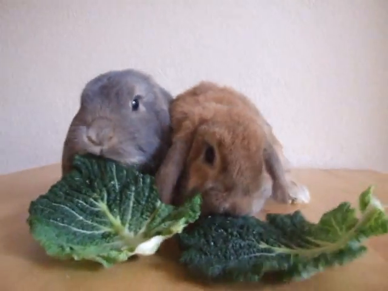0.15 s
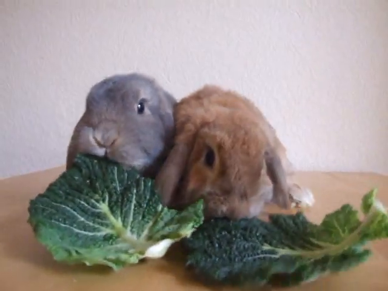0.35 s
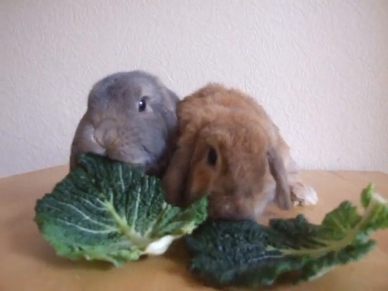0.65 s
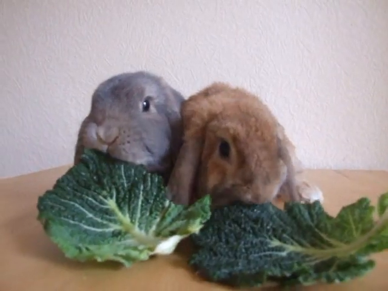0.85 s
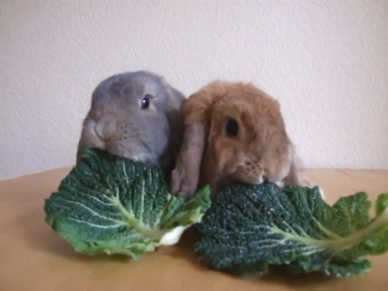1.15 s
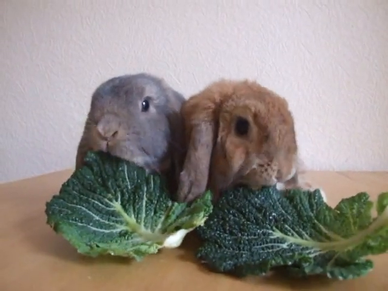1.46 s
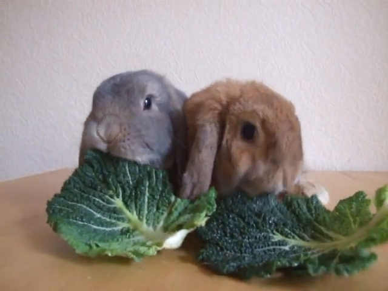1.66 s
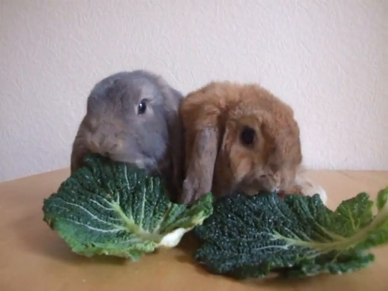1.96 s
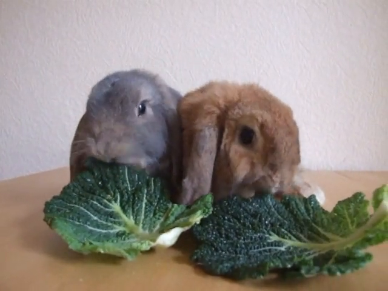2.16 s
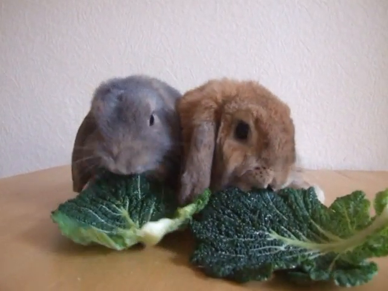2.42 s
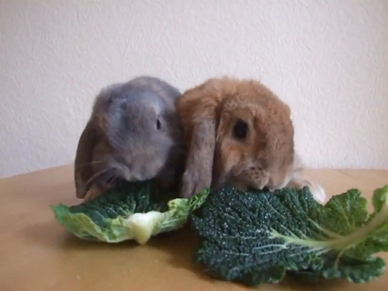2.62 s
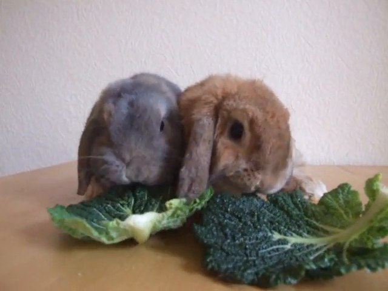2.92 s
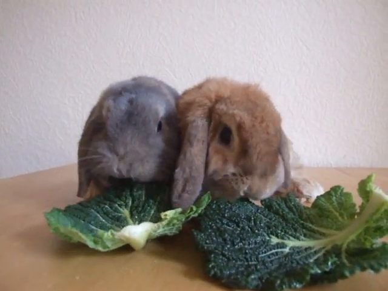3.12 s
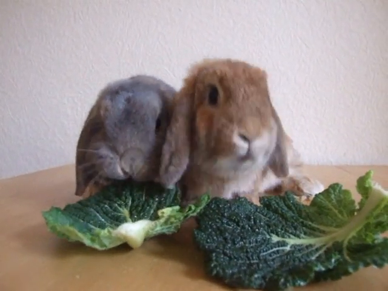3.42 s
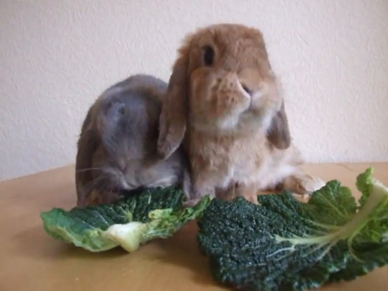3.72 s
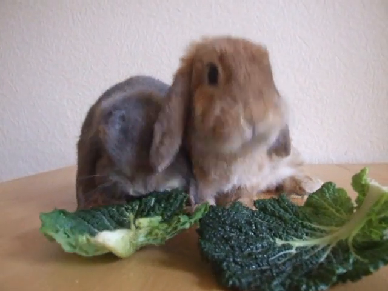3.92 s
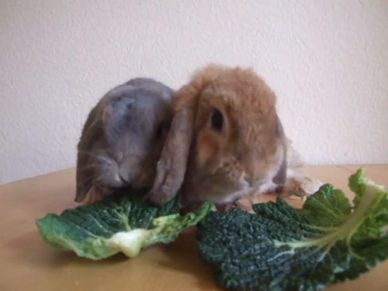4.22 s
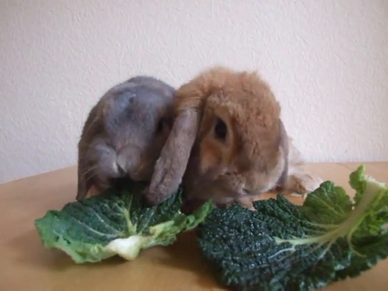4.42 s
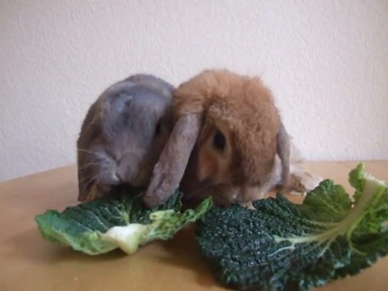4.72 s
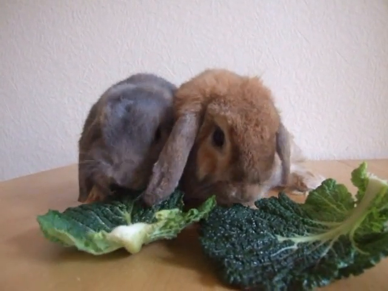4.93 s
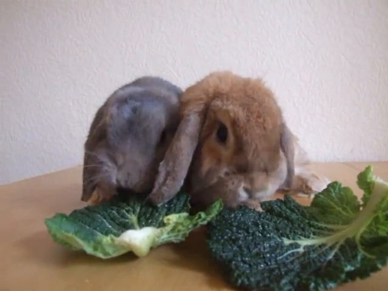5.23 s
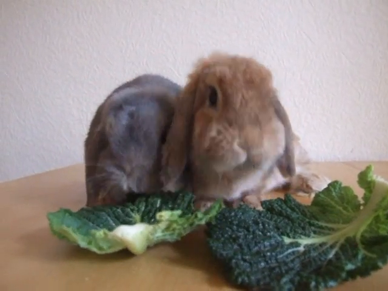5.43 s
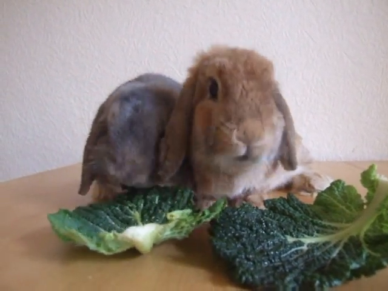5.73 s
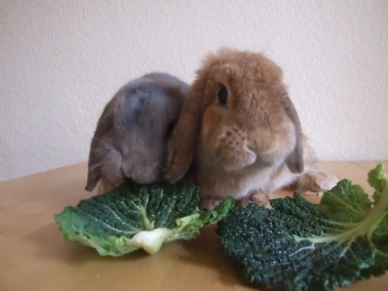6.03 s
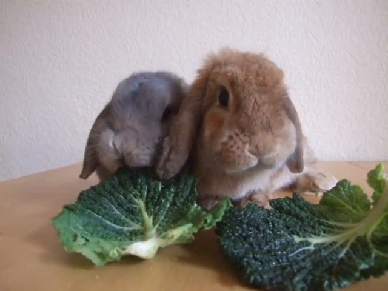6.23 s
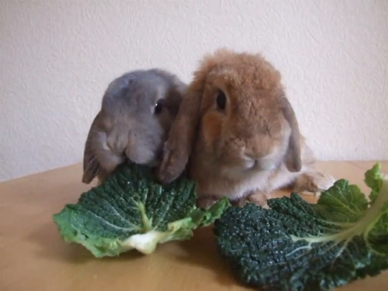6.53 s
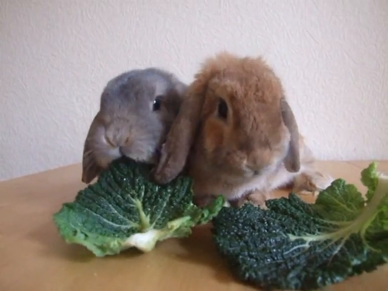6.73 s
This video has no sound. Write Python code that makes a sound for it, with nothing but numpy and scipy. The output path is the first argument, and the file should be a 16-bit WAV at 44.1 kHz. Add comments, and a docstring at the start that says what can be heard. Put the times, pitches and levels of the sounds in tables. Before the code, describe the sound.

Quick crunchy bites of leafy greens, tiny splintering cracks and soft chewing, with faint focus-motor ticking, low hum and a distant engine.

```python
"""Crisp snaps and soft crackle: two rabbits nibble savoy cabbage leaves on a table in a small quiet room.
Each bite cracks the skin, breaks the blade and splinters: noise bursts ringing through resonances.
Dense tiny cracks make the tearing, rustling and chewing; short rubs make the squeaks and bumps.
A camera's focus motor pips in runs of steps; filtered noise and sines make hiss, hum, whirr and engine drone."""
import sys
import numpy as np
from scipy import signal
from scipy.fft import rfft, irfft, next_fast_len
from scipy.io import wavfile

SR = 44100
rng = np.random.default_rng(int(sys.argv[2]) if len(sys.argv) > 2 else 0)


def to_wav(s):
    """Save 16-bit WAV."""
    ch = np.atleast_2d(s).T  # columns
    pcm = np.round(np.clip(ch, -1, 1) * 32767)  # PCM
    wavfile.write(sys.argv[1], SR, pcm.astype(np.int16))


N = 302967
TIME = np.arange(N) / SR
CUTOFF_HZ = 8100


def from_db(db):
    """Decibels to amplitude gain."""
    return 10 ** (np.asarray(db) / 20)


def rms_one(x):
    """Scale to rms 1."""
    return x / np.sqrt(np.mean(x ** 2) + 1e-20)


def in_time(rows):
    """Each column of a breakpoint curve, interpolated at every sample."""
    s, *columns = np.transpose(rows)
    return [np.interp(TIME, s, c) for c in columns]


def add(track, s, sound):
    """Mix a short sound into the track at time s."""
    start = int(np.clip(s * SR, 0, N - 1))
    track[start:start + len(sound)] += sound[:N - start]


def coloured(x, points):
    """Shape a signal by a spectrum of f/Hz, level/dB points, joined on a log frequency axis."""
    hz, db = np.transpose(points)
    size = next_fast_len(len(x))
    bins = np.maximum(np.fft.rfftfreq(size, 1 / SR), 1)
    gain = from_db(np.interp(np.log(bins), np.log(hz), db))
    return irfft(rfft(x, size) * gain, size)[:len(x)]


def resonance(x, hz, width_hz):
    """Two-pole resonance with gain about 1 on top."""
    r = np.exp(-np.pi * width_hz / SR)
    zeros = np.array([1, 0, -1]) * (1 - r * r) / 2
    poles = [1, -2 * r * np.cos(2 * np.pi * hz / SR), r * r]
    return signal.lfilter(zeros, poles, x + 1e-18)


def drift(rate):
    """Random wander of spread 1, in straight lines between knots at `rate` per second."""
    knots = rng.standard_normal(4096)
    return rms_one(np.interp(TIME * rate, np.arange(len(knots)), knots))


def top_cut(x):
    """Steep low-pass at the cut-off, without delay."""
    return signal.fftconvolve(x, signal.firwin(141, CUTOFF_HZ, window=("kaiser", 6), fs=SR), "same")


# Bites: skin cracks, blade breaks, then it splinters. Knock levels here and below are before KNOCK_TRIM_DB
# [break t/s, level/dB, ring f/Hz, knock level/dB, skin crack's lead t/s, skin level/dB, splinter level/dB]
BITE_TABLE = [(0.0233, -23.5, 3940, -54, .0098, -38.5, -53), (.184, -25, 4400, -50, 0.01, -33, -52),
              (0.3754, -35, 6300, -60, .02, -58, -48), (0.6787, -32, 5700, -43, .006, -56, -46),
              (1.0144, -33, 5920, -38, 0.0065, -54, -58), (1.2183, -40, 7260, -61, 0.0044, -47, -42),
              (1.2474, -35, 7000, -39, .009, -36, -45), (1.4684, -29.5, 5170, -39, 0.016, -31.5, -52),
              (1.4826, -31, 6900, -35, 0.0043, -46, -45), (1.9232, -31, 6470, -57, 0.017, -44.5, -40),
              (2.1639, -27.5, 5870, -34, 0.0078, -33, -34.5), (2.213, -38, 6950, -62, .01, -49, -49),
              (2.35, -32, 7050, -38, .02, -52, -38), (2.3664, -33.5, 5000, -32, 0.009, -40, -33.5),
              (2.4108, -40, 6360, -54, .025, -40, -55), (2.5975, -29, 7350, -41, .0221, -34, -51),
              (2.7907, -35, 5200, -37.5, 0.0067, -34.5, -48),
              (3.0212, -32.5, 4820, -36.5, 0.0067, -57, -47), (3.244, -35, 6460, -42, .014, -46, -41),
              (3.4668, -37.5, 4560, -39.5, .006, -51, -52), (3.4893, -35.5, 7050, -47, 0.0045, -54, -46),
              (3.7175, -32.5, 6000, -48, 0.0032, -35, -46), (3.9106, -33.5, 7000, -46, .006, -57, -36),
              (4.4653, -34.5, 7060, -47, 0.0045, -48, -52), (4.5098, -33, 6900, -49, 0.0047, -57, -30),
              (4.524, -25, 5200, -28.5, 0.012, -36, -41), (4.7957, -40.5, 5570, -45, 0.024, -55, -54),
              (5.2854, -22, 6310, -46.5, 0.0019, -31, -42), (5.3045, -18.5, 6330, -36.5, .0092, -32, -49),
              (5.9132, -27, 6470, -65, 0.0046, -32.5, -35), (6.1001, -36.5, 7100, -47, .008, -45, -40.5),
              (6.2978, -39.5, 4830, -37.5, 0.015, -46, -49), (6.5645, -39.5, 5900, -60, 0.015, -38.5, -38),
              (6.7641, -28, 5000, -29, 0.022, -42.5, -40), (6.784, -35, 5000, -38.5, .003, -44, -39)]
SKIN_HZ, SKIN_KNOCK_DB = 6390, -19   # knock relative to the skin crack
SPLINTER_GAP_S, SPLINTER_LOSS_DB = .0055, 5.5   # mean spacing; mean loss from one to the next
SPLINTER_HZ, SPLINTER_KNOCK_DB = 6300, -14   # mean ring; knock relative to the splinter


def bite_cracks():
    """A bite cracks the stiff skin, breaks the blade, then sheds four weakening splinters."""
    rows = []
    chances = rng.uniform(-1, 1, (len(BITE_TABLE), 4, 3))
    for (s, db, hz, knock_db, lead_s, skin_db, splinter_db), chance in zip(BITE_TABLE, chances):
        rows.append((s - lead_s, skin_db, SKIN_HZ, skin_db + SKIN_KNOCK_DB))
        rows.append((s, db, hz, knock_db))
        for k, (gap, size, pitch) in enumerate(chance):
            s = s + SPLINTER_GAP_S * (1 + .5 * gap)
            level_db = splinter_db - SPLINTER_LOSS_DB * k + 2 * size
            splinter_hz = SPLINTER_HZ * (1 + .15 * pitch)
            rows.append((s, level_db, splinter_hz, level_db + SPLINTER_KNOCK_DB))
    return rows


# Teeth meeting with a dull click [t/s, knock level/dB]
TOOTH_CLICK_TABLE = [(1.0889, -40.5), (1.339, -43), (1.5697, -42.5), (1.5965, -40), (1.9362, -36.5),
                     (2.0473, -36), (2.6064, -42), (2.6738, -39.5), (5.0423, -41), (6.0087, -44.5),
                     (6.3135, -38.5), (6.3792, -45), (6.745, -36.5)]
TOOTH_HZ, TOOTH_RING_DB = 2180, -8.5   # ring relative to the click


def tooth_clicks():
    """Meeting teeth give mostly knock and a weaker, lower ring."""
    return [(s, db + TOOTH_RING_DB, TOOTH_HZ, db) for s, db in TOOTH_CLICK_TABLE]


TICKS_PER_S, TICK_DB, TICK_SPREAD_DB = 14, -48, 1   # TICK_DB is the quietest level
TICK_LOW_HZ, TICK_HIGH_HZ, TICK_KNOCK_DB = 3600, 7760, -8   # knock relative to the tick


def stray_ticks():
    """Handled leaves tick at random times and pitches."""
    rows = []
    for when, size, pitch in rng.random((int(TICKS_PER_S * N / SR), 3)):
        level_db = TICK_DB - TICK_SPREAD_DB * np.log(max(size, .1))
        hz = TICK_LOW_HZ + pitch * (TICK_HIGH_HZ - TICK_LOW_HZ)
        rows.append((when * (N - 1) / SR, level_db, hz, level_db + TICK_KNOCK_DB))
    return rows


# Width of a snap's ring by its pitch, tough ribs to thin blade [f/Hz, width/Hz]
RING_WIDTH_CURVE = [(2000, 540), (4400, 3460), (5600, 3300), (6900, 860)]
SNAP_S = .0022   # length over which a snap's rms level is reckoned
KNOCK_TRIM_DB = -0.5


def snaps(rows, split_s=0.00054, split_size=0.25, broad_share=0.049, broad_hz=3000,
          knock_hz=1150, knock_width_hz=1900):
    """A cell wall bursts and its neighbours split in about a millisecond; leaf and jaw knock dully."""
    out, t = np.zeros(N), np.arange(512) / SR
    burst = np.arange(len(t)) == 0
    span = np.sqrt(SNAP_S * SR / len(t))
    lead = 32   # samples of room for the low-pass to ring before the onset
    for s, level_db, hz, dull_db in rows:
        force = burst + split_size * rng.standard_normal(len(t)) * np.exp(-t / split_s)
        half = min(np.interp(hz, *np.transpose(RING_WIDTH_CURVE)) / 2, .8 * hz)
        ring = signal.lfilter(*signal.butter(2, [hz - half, hz + half], "band", fs=SR), force)
        broad = resonance(resonance(force, broad_hz, broad_hz), hz, 2 * hz)
        crisp = top_cut(np.pad(ring + broad_share * broad, (lead, 0))[:len(t)])
        knock = resonance(resonance(force, knock_hz, knock_width_hz), knock_hz, knock_width_hz)
        add(out, s - lead / SR, span * from_db(level_db) * rms_one(crisp))
        add(out, s, span * from_db(dull_db + KNOCK_TRIM_DB) * rms_one(knock))
    return out


def crackle(colour, per_s=1500, spread_db=4.0, clump_db=5.0):
    """Countless tiny leaf cracks in quick clumps; rms 1."""
    born = rng.random(N) < per_s / SR
    sizes = from_db(spread_db * np.minimum(rng.exponential(1, N), 3)) * rng.choice([-1, 1], N)
    clumps = from_db(clump_db * drift(rate=98))
    return rms_one(top_cut(coloured(born * sizes * clumps, colour)))


# Colour of the leaf crackle, also heard in the drags below [f/Hz, relative level/dB]
LEAF_COLOUR = [(500, -15.5), (1200, -13.5), (2200, -8.5), (3300, -11), (5000, -5), (7000, 0.5), (8500, -13)]


def tearing(rows, reach_s=0.015, level_db=-34.5, growth=0.6):
    """Fibres give way just before and after each snap, more so around the big ones."""
    power = np.zeros(N)
    for s, snap_db, _, _ in rows:
        power[int(s * SR)] += from_db(growth * snap_db + level_db) ** 2
    strain = np.exp(-np.abs(np.arange(-4096, 4097)) / (reach_s * SR))
    swell = np.sqrt(np.maximum(signal.fftconvolve(power, strain, "same"), 0))
    return swell * crackle(LEAF_COLOUR)


def rubs(rows, rise_s, width_hz):
    """Brief friction that swells and dies in one resonance."""
    out, t = np.zeros(N), np.arange(4096) / SR
    swell = t / rise_s * np.exp(1 - t / rise_s)
    for s, db, hz in rows:
        force = swell * rng.standard_normal(len(t))
        sound = resonance(resonance(force, hz, width_hz), hz, 2 * width_hz)
        add(out, s, from_db(db) * rms_one(sound) * np.sqrt(2 * np.mean(swell ** 2)))
    return out


# Teeth squeaking on the waxy leaf [t/s, crest level/dB, f/Hz]
SQUEAK_TABLE = [(.034, -38.5, 1950), (.133, -37, 1950), (.195, -41.5, 1950)]


def squeaks():
    """Teeth rub the wax in very short, pitched friction."""
    return rubs(SQUEAK_TABLE, rise_s=0.00089, width_hz=310)


# Diffuse echo's colour [f/Hz, gain/dB]
ECHO_COLOUR = [(300, 11), (1000, 0), (2200, -1.5), (4000, -6), (7000, -8), (8500, -9)]


def room(x, t60=0.39, wet_db=-7.0, gap_s=0.003):
    """The bare walls return a diffuse, short tail: decaying noise, coloured and convolved."""
    t = np.arange(SR // 2) / SR
    tail = rng.standard_normal(len(t)) * from_db(-60 * t / t60) * (t > gap_s)
    tail = coloured(tail / np.sqrt(np.sum(tail ** 2)), ECHO_COLOUR)
    return from_db(wet_db) * signal.fftconvolve(x, tail)[:N]


def rustle(swells, colour, rest_db):
    """Soft crackle that swells with each movement and never quite stops."""
    power = sum(from_db(db) ** 2 * np.exp(-((TIME - s) / half_s) ** 2) for s, db, half_s in swells)
    return np.sqrt(power + from_db(rest_db) ** 2) * crackle(colour)


# Leaves dragged against each other [t/s, swell level/dB, half length t/s]
DRAG_TABLE = [(1.23, -54, 0.04), (1.91, -57, 0.02), (2.59, -44, 0.017), (2.86, -56, 0.046),
              (3.18, -52, .03), (3.52, -54, 0.022), (3.75, -49.5, 0.022), (4.31, -61, 0.029),
              (6.32, -48, .02), (6.57, -56, 0.029), (6.66, -58, 0.092)]


def leaf_drags():
    """Dragged leaves crackle in bright swells."""
    return rustle(DRAG_TABLE, LEAF_COLOUR, rest_db=-60.5)


# Moist grinding in the cheeks [t/s, swell level/dB, half length t/s]
GRIND_TABLE = [(.07, -65, 0.037), (.24, -57, 0.18), (.73, -57.5, 0.069), (1.65, -56.5, 0.11),
               (1.91, -47.5, 0.015), (2.16, -49, 0.022), (3.21, -53, 0.037), (3.75, -61.5, 0.082),
               (4.30, -58, 0.058), (4.72, -54, 0.039), (6.65, -58.5, 0.23)]
# Colour of the grinding [f/Hz, relative level/dB]
CHEEK_COLOUR = [(400, -18.5), (1200, -4.5), (2100, 1), (2900, -12.5), (4200, -7), (8000, -18.5)]


def cheek_grinding():
    """Leaf ground in the cheeks crackles in duller swells."""
    return rustle(GRIND_TABLE, CHEEK_COLOUR, rest_db=-65.5)


# Soft bumps on the table [t/s, crest level/dB, f/Hz]
BUMP_TABLE = [(.757, -54.5, 196), (1.155, -57, 307), (1.812, -54.5, 600)]


def bumps():
    """The table answers each bump with a soft, low resonance."""
    return rubs(BUMP_TABLE, rise_s=0.0058, width_hz=160)


# Focus hunts: spaced probing moves, a pause, then a quick run [t/s, probes, quick moves]
HUNT_TABLE = [(.025, 1, 0), (.259, 0, 3), (.392, 3, 3), (1.259, 1, 0), (1.326, 0, 2), (1.459, 1, 0),
              (1.626, 0, 2), (2.125, 3, 3), (2.792, 1, 0), (2.992, 3, 3), (4.1255, 2, 4), (4.9255, 6, 4)]
BEAT_S, PROBE_BEATS = 1 / 30, 3   # quick moves come every beat, probes every third
FOCUS_DB, FOCUS_FADE_DB, FOCUS_SPREAD_DB = -48.5, 0.36, 1.5   # mean first move; loss per move; scatter


def focus_moves():
    """Each motor move as t/s, level/dB, on an even beat within its hunt."""
    for s, probes, quick in HUNT_TABLE:
        run_start = PROBE_BEATS * probes + (probes > 0)
        beats = [PROBE_BEATS * k for k in range(probes)] + [run_start + k for k in range(quick)]
        for k, beat in enumerate(beats):
            scatter_db = FOCUS_SPREAD_DB * rng.standard_normal()
            yield s + beat * BEAT_S, FOCUS_DB - FOCUS_FADE_DB * k + scatter_db


# Lens barrel resonances [f/Hz, width/Hz, relative gain/dB]
BARREL_MODES = [(666, 180, 4.5), (1460, 640, -6), (1950, 190, -5), (2325, 87, 0.5), (5000, 5000, -39)]


def focus_motor(move_s=.0095, start_hz=610, end_hz=800, rasp=0.12, fade_s=0.02, pitch_spread=.025):
    """Each move is a short accelerating run of motor steps that rings the lens barrel."""
    out, t = np.zeros(N), np.arange(1024) / SR
    envelope = np.sqrt(np.maximum(1 - (t / move_s) ** 2, 0)) * np.exp(-t / fade_s)
    for s, db in focus_moves():
        rate = (start_hz + (end_hz - start_hz) * t / move_s) * (1 + pitch_spread * rng.standard_normal())
        steps = np.diff(np.floor(np.cumsum(rate) / SR), prepend=-1)   # one impulse per step
        drive = (steps + rasp * rng.standard_normal(len(t))) * envelope
        pip = sum(from_db(gain_db) * resonance(drive, hz, width) for hz, width, gain_db in BARREL_MODES)
        add(out, s, from_db(db) * rms_one(pip))
    return out


# A far engine, gathering speed after a slight early sag
# [t/s, third order f/Hz, third order level/dB, fourth order level/dB]
ENGINE_CURVE = [(0, 40, -76, -80), (1.2, 40, -71, -60), (1.6, 38, -69, -66), (1.95, 50, -54.5, -73),
                (2.35, 55.5, -58.5, -73.5), (3.0, 65, -62, -83), (3.6, 69, -61, -72), (4.1, 71, -66.5, -69),
                (4.8, 75, -68, -68), (5.4, 78, -65, -62), (6.1, 85.5, -60.5, -67), (6.87, 89, -55.5, -71)]
OVERTONE_DB, OVERTONE_HZ, OVERTONE_WIDTH_HZ = -10.5, 300, 110   # each into the resonance, re third order


def engine_drone(waver=0.17):
    """Sines at multiples of a wavering turn rate; the upper ones come through one broad resonance."""
    hz, third_db, fourth_db = in_time(ENGINE_CURVE)
    turn = 2 * np.pi * np.cumsum(hz / 3) / SR + waver * drift(rate=9)   # radians
    third = from_db(third_db) * rms_one(np.sin(3 * turn))
    fourth = from_db(fourth_db) * rms_one(np.sin(4 * turn))
    overtones = sum(rms_one(np.sin(order * turn)) for order in range(6, 18, 3))
    body = resonance(overtones, OVERTONE_HZ, OVERTONE_WIDTH_HZ)
    return third + fourth + from_db(third_db + OVERTONE_DB) * body


def mains_hum(hz=50.2, level_db=-61, half_rate_db=-67):
    """A steady mains sine with a weaker one at half its rate."""
    mains = 2 * np.pi * hz * TIME
    return from_db(level_db) * rms_one(np.sin(mains)) + from_db(half_rate_db) * rms_one(np.sin(mains / 2))


def whirr(hz=234, width_hz=10, level_db=-70):
    """Noise through one narrow resonance gives a faint whirr."""
    return from_db(level_db) * rms_one(resonance(rng.standard_normal(N), hz, width_hz))


# Colour of the steady hiss and rumble [f/Hz, relative level/dB]
HISS_COLOUR = [(22, -3), (45, -13), (70, -8), (110, -17.5), (145, -17), (190, -18.5), (250, -17.5),
               (340, -14), (420, -16), (670, -15), (1100, -19), (2300, -21), (3400, -23), (7000, -24)]


def hiss(level_db=-54):
    """Even noise, from low rumble up to the camera's hiss."""
    return from_db(level_db) * rms_one(top_cut(coloured(rng.standard_normal(N), HISS_COLOUR)))


def scene():
    """The nibbling with its room echo, over chewing, bumps, camera and background."""
    cracks = bite_cracks() + tooth_clicks() + stray_ticks()   # rows: t/s, level/dB, f/Hz, knock/dB
    bites = snaps(cracks) + tearing(cracks) + squeaks()
    chewing = leaf_drags() + cheek_grinding()
    background = engine_drone() + mains_hum() + whirr() + hiss()
    return (bites + room(bites) + chewing + bumps() + focus_motor() + background)[None]


def record(dry):
    """A steep low-pass takes off everything well above the cut-off."""
    return top_cut(dry[0])[None]


dry = scene()
out = record(dry)
to_wav(out)
```